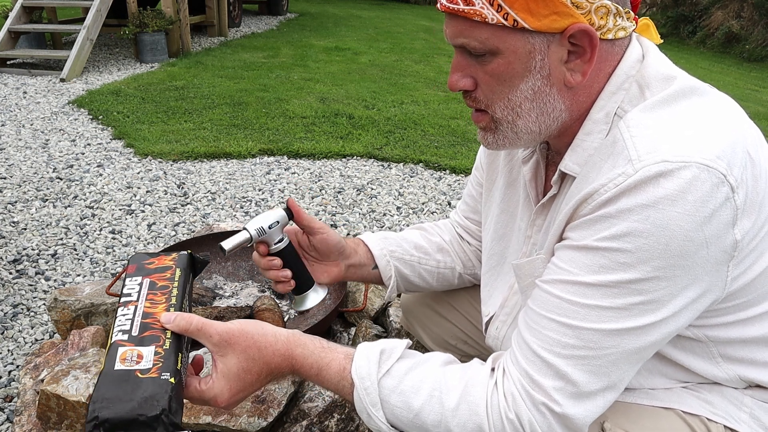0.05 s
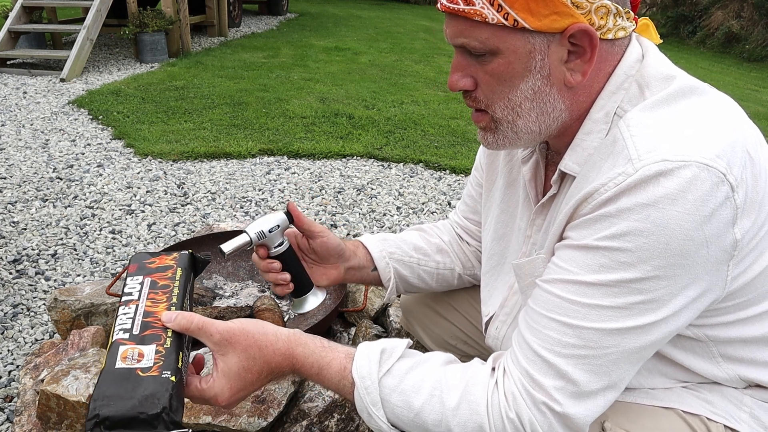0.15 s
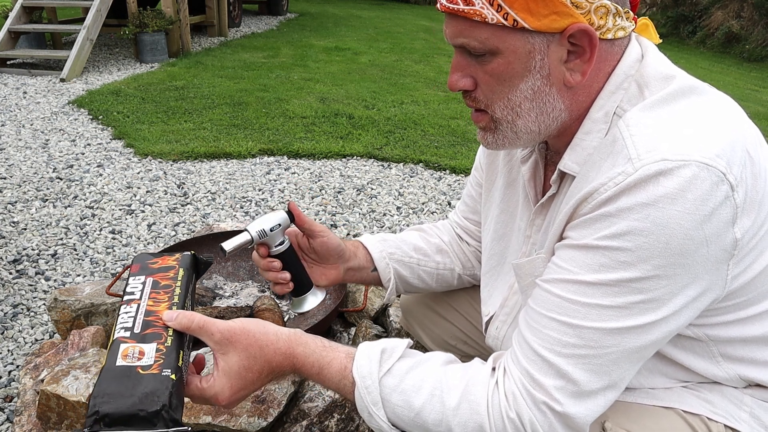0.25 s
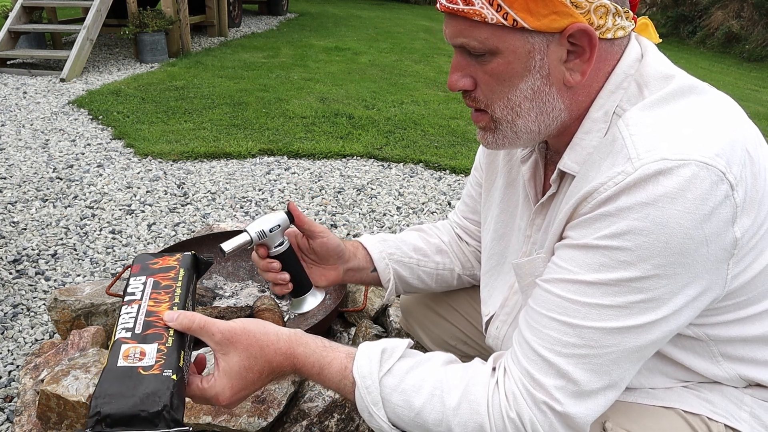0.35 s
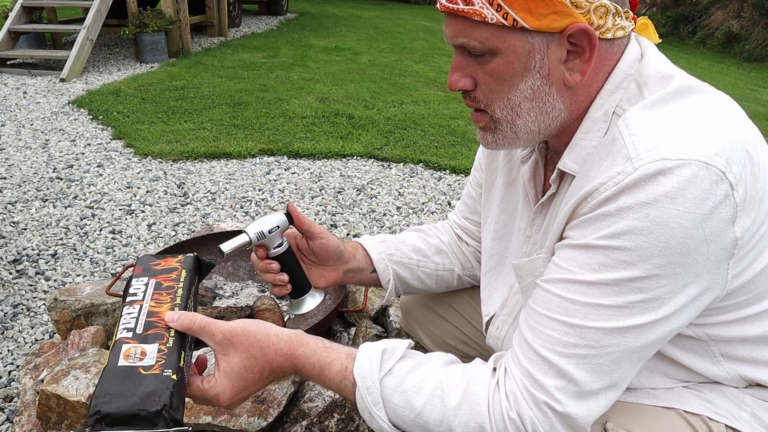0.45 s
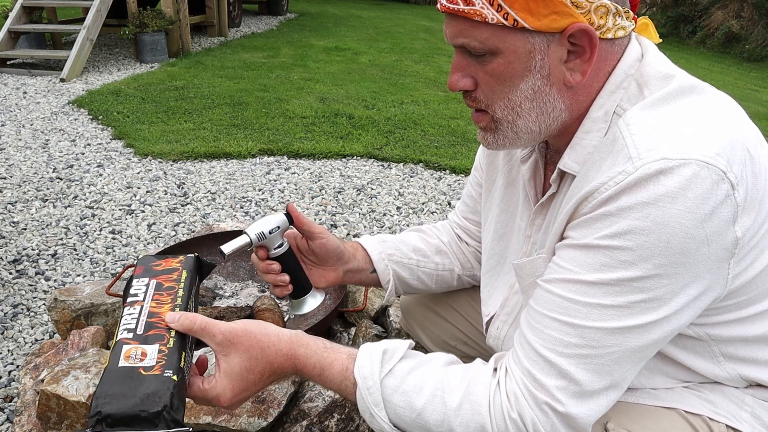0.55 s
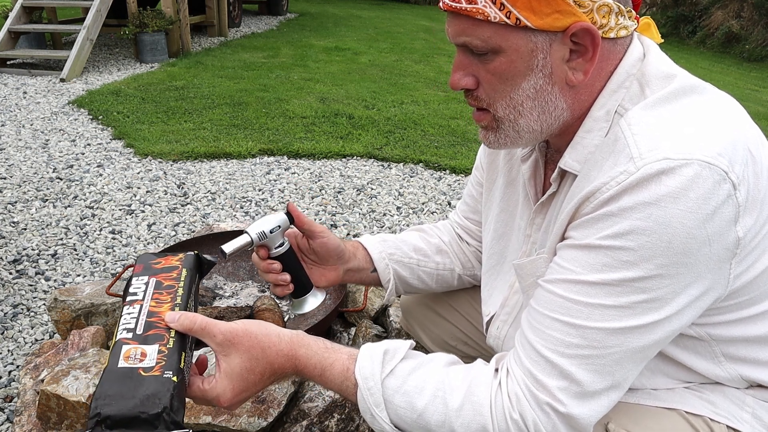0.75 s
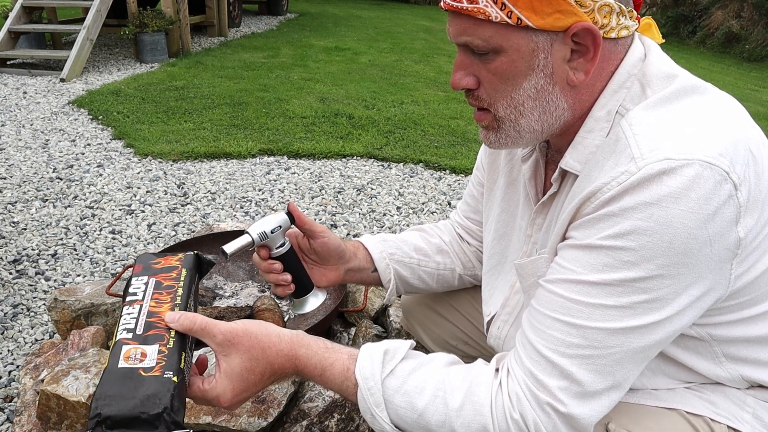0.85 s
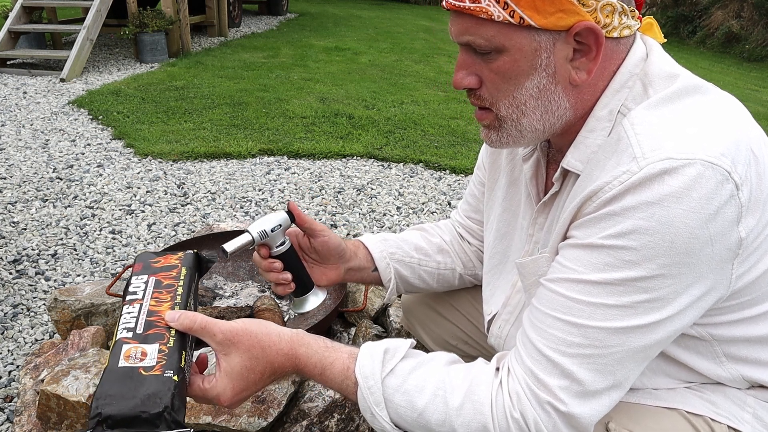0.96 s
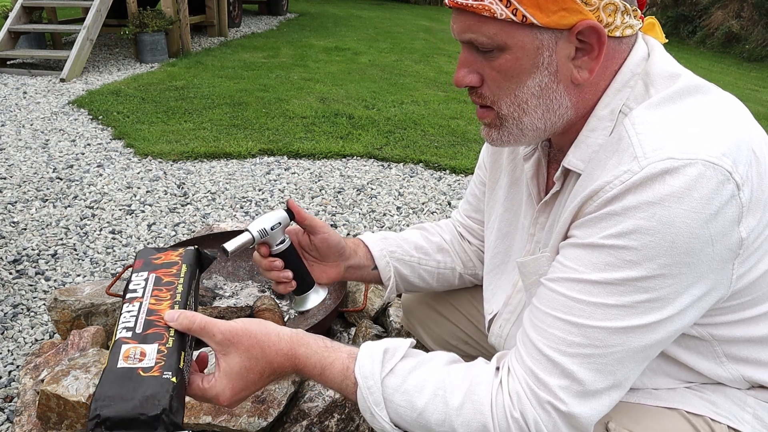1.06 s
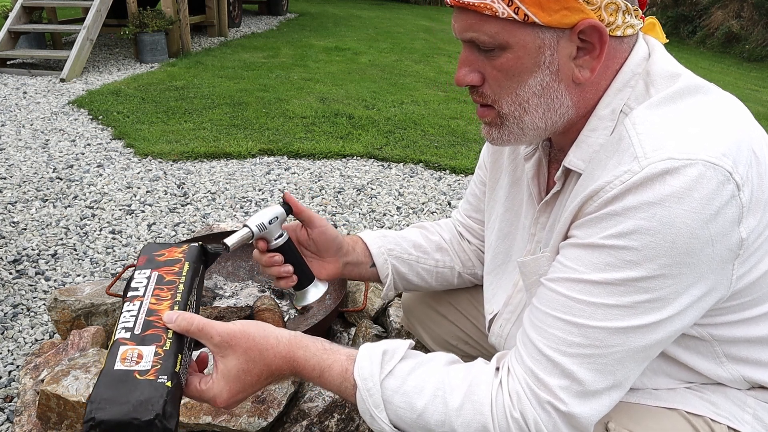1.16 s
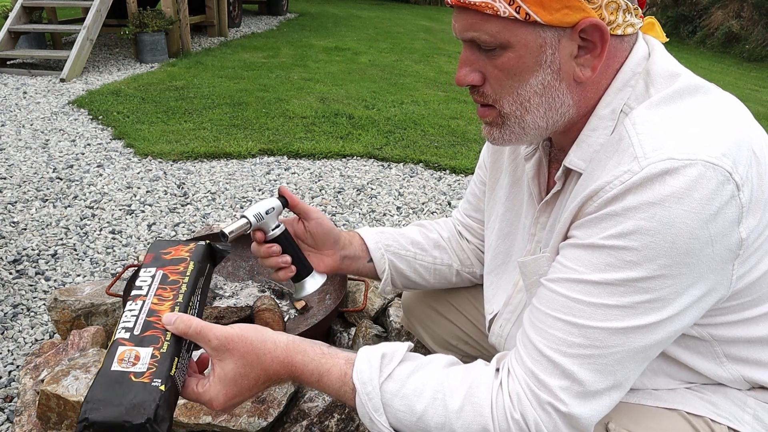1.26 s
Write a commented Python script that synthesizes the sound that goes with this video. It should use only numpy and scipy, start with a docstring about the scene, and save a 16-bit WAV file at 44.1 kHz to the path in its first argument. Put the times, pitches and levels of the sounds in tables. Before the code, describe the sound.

Gas torch close up: brief cold hiss, sharp igniter click, steady breathy flame, quick shut-off.

```python
"""A handheld gas torch, close to the microphone, outdoors in quiet garden air with a low breeze.
Cold gas hisses and whistles (shaped noise), then the igniter snaps (decaying modes and noise cracks).
The flame catches and roars softly (noise and resonances) over the hiss of its jet, amid a grainy rustle.
It pops once more (short swinging pulses), and the trigger is let go with a small tick."""
import sys
import numpy as np
from scipy import signal
from scipy.io import wavfile
from scipy.ndimage import uniform_filter1d

SR = 44100
rng = np.random.default_rng(int(sys.argv[2]) if len(sys.argv) > 2 else 0)


def invert_db(x):
    """Field ratio 10**(x/20) for x, a level in decibels (scalar or array-like)."""
    u = np.asarray(x, float) / 20
    return 10 ** u


def log_audio(samples):
    """Write samples as a 16-bit WAV file to the path given in sys.argv[1]."""
    # one column per channel
    frames = np.atleast_2d(samples).T
    # limit to full scale, then quantise
    limited = np.clip(frames, -1, 1)
    pcm = np.round(limited * 32767).astype(np.int16)
    wavfile.write(sys.argv[1], SR, pcm)


N = 57330
T = np.arange(N) / SR
NOISE_TOP_HZ = 15750  # noise layers have no treble above this, except the cracks of the blows
LIT_S, CATCH_S = 0.231, 0.0086  # the flame starts to catch, and takes this long


def evened(x):
    """Scales a signal to an rms of 1."""
    return x / np.sqrt(np.mean(x ** 2) + 1e-20)


def read(points, hz):
    """Reads a spectrum table at hz, on a logarithmic frequency axis."""
    f, value = np.transpose(points)
    return np.interp(np.log(hz + 1), np.log(f + 1), value)


def add(mix, s, sound):
    """Adds a sound to the mix in place, from s seconds on."""
    part = mix[round(s * SR):][:len(sound)]
    part += sound[:len(part)]


def noise(spectrum, patchy_db, flicker_db=0., size=512, top_hz=NOISE_TOP_HZ):
    """Random short-time spectra with drifting patches and a flicker shared by all bands; rms 1."""
    hop = size // 4
    frames, hz = N // hop + 5, np.fft.rfftfreq(size, 1 / SR)
    real, imaginary, patches = rng.standard_normal((frames, len(hz), 3)).T
    patches = uniform_filter1d(patches, size=9, axis=0)  # across frequency
    patches = evened(uniform_filter1d(patches, size=18, axis=1))  # across time
    flicker = evened(uniform_filter1d(rng.standard_normal(frames), size=4))
    level_db = read(spectrum, hz)[:, None] + patchy_db * patches + flicker_db * flicker
    z = (real + 1j * imaginary) * invert_db(level_db) * (hz < top_hz)[:, None]
    return evened(signal.istft(z, nperseg=size, noverlap=size * 3 // 4)[1][:N])


def resonate(x, hz, width):
    """Shifts hz to zero, smooths, shifts back: a resonance of gain 1."""
    turn = np.exp(2j * np.pi * hz * T)
    r = np.exp(-np.pi * width / SR)
    smooth = signal.lfilter([1 - r], [1, -r], x / turn)
    return 2 * (turn * smooth).real


def ramp(start, length):
    """Climbs in a straight line from 0 to 1."""
    return np.clip((T - start) / length, 0, 1)


# Spectrum of the quiet garden air: [f/Hz, relative level/dB per Hz]
AIR_SPECTRUM = [(20, -8), (70, -4.5), (130, -15.5), (500, -13.5), (1100, -17), (2500, -26.5), (16000, -34)]


def garden_air():
    """Faint, mostly low noise of the open air, slowly patchy."""
    return invert_db(-64) * noise(AIR_SPECTRUM, 1.6, size=2048)


def breeze():
    """A low breeze passes the microphone: rumbling noise under one bell-shaped swell."""
    centre_s, width_s, peak_db = 0.5, 0.24, -65.5  # width: from the centre down to 1/e
    rumble = noise([(20, -7), (90, 1), (200, -37)], 2.5, size=2048)
    return invert_db(peak_db) * rumble * np.exp(-((T - centre_s) / width_s) ** 2)


# Mid-high swells: [centre t/s, rise t/s, fall t/s, level/dB, treble level relative to it/dB]
RUSTLE_SWELLS = [(.3, 0.047, 0.17, -53, 0), (.49, 0.02, 0.019, -50, 2), (0.559, 0.021, 0.011, -52.5, 3.5),
                 (.655, 0.044, 0.052, -47, 3.5), (0.713, 0.049, 0.056, -49, -0.5),
                 (1.126, 0.037, 0.02, -47.5, -7), (1.15, 0.0053, 0.0086, -43.5, -12),
                 (1.19, 0.022, 0.03, -51, 0), (1.261, 0.0077, 0.013, -54.5, -4)]
# Spectrum of the grain: [f/Hz, relative level/dB per Hz]
RUSTLE_SPECTRUM = [(900, -30), (1400, -6.5), (2500, -3.5), (3250, -6.5), (3800, -1.5), (4400, -7.5),
                   (5100, -5.5), (6000, -11), (8300, -13), (10000, -42)]


def rustle():
    """Soft bell-shaped swells of grainy noise, each with more or less treble; their powers add."""
    grain = noise(RUSTLE_SPECTRUM, 1.5, 0.98, size=256)
    treble_hz = 4360
    low = signal.sosfiltfilt(signal.butter(4, treble_hz, fs=SR, output="sos"), grain)
    treble = grain - low
    low_power, treble_power = np.zeros(N), np.zeros(N)
    for s, rise, fall, db, treble_db in RUSTLE_SWELLS:
        bell = np.exp(-((T - s) / np.where(T < s, rise, fall)) ** 2)
        low_power += bell * invert_db(db) ** 2
        treble_power += bell * invert_db(db + treble_db) ** 2
    return np.sqrt(low_power) * low + np.sqrt(treble_power) * treble


# Spectrum of the crack in each blow: [f/Hz, relative level/dB per Hz]
CRACK_SPECTRUM = [(800, -30), (1910, -3), (3900, -6), (5100, -22), (8200, 2.5), (10600, -26), (12600, -1),
                  (15300, -9), (16700, -50)]


def strike(modes, blows):
    """Each blow rings the decaying modes of the struck part and throws a short noise crack."""
    crack_db, crack_t60_s, attack_s = -5, 0.019, 0.00023
    out, t = np.zeros(N), T[:3000]
    crack = noise(CRACK_SPECTRUM, 0., size=256, top_hz=SR / 2)
    for s, db, tilt_db in blows:
        ring = np.zeros(len(t))
        for hz, mode_db, t60 in modes:
            tilted_db = mode_db + tilt_db * np.log2(hz / 4000)
            ring += invert_db(tilted_db - 60 * t / t60) * np.sin(2 * np.pi * hz * t)
        start = int(rng.random() * (N - len(t)))  # a random stretch of crack for each blow
        burst = crack[start:][:len(t)] * invert_db(crack_db - 60 * t / crack_t60_s)
        add(out, s, invert_db(db) * np.minimum(t / attack_s, 1) * (0.56 * ring + burst))
    band = signal.butter(5, [900, 16600], "bandpass", fs=SR, output="sos")  # Hz
    return signal.sosfilt(band, out)


# Ringing of the trigger lever: [f/Hz, relative level/dB, t60/s]
LEVER_MODES = [(1430, 11, .007), (3060, 6, .006), (5100, 7, .0025), (7400, 5, .005), (8600, 4, .005),
               (12950, 0, .005)]
# The lever springs back: [t/s, level/dB, tilt of the ringing/dB per octave about 4 kHz]
RELEASE_BLOWS = [(1.2341, -38, -1), (1.2348, -39, 2)]


def trigger_release():
    """The trigger lever springs back and ticks: two faint blows ring it."""
    return strike(LEVER_MODES, RELEASE_BLOWS)


# Ringing of the torch body: [f/Hz, relative level/dB, t60/s]
BODY_MODES = [(1480, -9, 0.014), (1760, -4, 0.014), (1990, -4.5, 0.014), (2990, -12, 0.013),
              (3700, -4, 0.008), (4400, -7, 0.01), (6200, -3, 0.018), (7550, 0, 0.016), (7980, -3, 0.015),
              (8380, 1.5, 0.016), (8800, -4, 0.014), (12150, 0.5, 0.007), (13380, -0.5, 0.012),
              (13850, -5, 0.01), (15200, -5, 0.007)]
# Blows of the igniter: [t/s, level/dB, tilt of the ringing/dB per octave about 4 kHz]
IGNITER_BLOWS = [(.2304, -10.5, 1.4), (0.23095, -17, -5), (.2325, -21, 0), (0.2352, -24.5, 1)]


def igniter():
    """The igniter snaps: blows in quick succession ring the torch body."""
    return strike(BODY_MODES, IGNITER_BLOWS)


# Cold gas through the nozzle: [f/Hz, relative level/dB per Hz]
COLD_SPECTRUM = [(1500, -24.5), (3700, -22), (4300, -4), (5400, -2.5), (5950, -11), (6700, 0), (7500, -5),
                 (8600, -2.5), (10700, -13), (12200, -7), (13300, -4), (14500, -16)]
# Whistle of the nozzle: [f/Hz, width/Hz, level relative to the hiss/dB]
NOZZLE_WHISTLE = [(13040, 100, -6.5)]


def cold_gas():
    """The valve opens; unlit gas hisses and faintly whistles until the flame catches."""
    open_s, rise_s, level_db = 0.081, 0.013, -52.5
    hiss = noise(COLD_SPECTRUM, 1.5, 1.)
    whistle = sum(invert_db(db) * evened(resonate(hiss, hz, width)) for hz, width, db in NOZZLE_WHISTLE)
    unlit = ramp(open_s, rise_s) * (1 - ramp(LIT_S, CATCH_S))
    return invert_db(level_db) * (hiss + whistle) * unlit


# Flame pops: [t/s, level/dB, f/Hz, cycles until the swing has decayed to about a third]
FLAME_POPS = [(.2327, -35, 440, 1.2), (.2349, -30, 290, 1.4), (.2345, -37, 150, .9),
              (1.1408, -38, 670, 2.2), (1.1431, -32, 270, 1.1)]


def pops():
    """A pocket of gas burns at once: a pulse that swings a few times."""
    out, t = np.zeros(N), T[:3000]
    for s, db, hz, cycles in FLAME_POPS:
        u = t * hz / cycles * 3.26
        swell = np.e * u * np.exp(-u)  # peaks at 1 where u = 1
        add(out, s, invert_db(db) * swell * np.sin(2 * np.pi * hz * t))
    return out


# Gas flow: [t/s, jet level/dB, roar level/dB]
GAS_FLOW = [(.235, -55, -47), (.255, -52.5, -45.5), (.32, -51.5, -47), (.43, -54.5, -47),
            (.53, -53.5, -48.5), (.65, -51, -45.5), (.8, -54.5, -48.5), (.9, -51.5, -45),
            (1.05, -50.5, -46), (1.125, -54, -48), (1.15, -51, -45), (1.217, -51, -45),
            (1.226, -52.5, -50.5), (1.25, -60, -50), (1.275, -69, -54.5), (1.3, -71.5, -61.5)]
# Jet once the flame burns: [f/Hz, relative level/dB per Hz]
JET_SPECTRUM = [(3000, -48), (4200, -12.5), (5200, -4), (5900, -14), (7200, -10), (8300, 1.5), (8900, -6.5),
                (9700, -18), (12500, -4.5), (14000, -7.5), (16000, -24)]
# Broad roar of the flame: [f/Hz, relative level/dB per Hz]
ROAR_SPECTRUM = [(30, -36), (100, -12.5), (200, -1.5), (350, -1.5), (700, -5.5), (1500, -8), (3200, -12),
                 (6000, -28.5), (9000, -47)]
# Hollows the roar rings in: [f/Hz, width before a 1.4-fold widening/Hz, relative level/dB]
ROAR_HOLLOWS = [(335, 85, -3), (521.7, 53, -5), (671.5, 65, 0.5), (1015, 69, -4), (1267, 133, -4),
                (1794, 94, -6), (2429, 80, -12)]


def flame():
    """Jet hiss and turbulent roar with hollow resonances, both following the gas flow."""
    s, jet_db, roar_db = np.transpose(GAS_FLOW)
    broad = noise(ROAR_SPECTRUM, 2.63, 0.67, size=1024)
    white = noise([(20, 0), (20000, 0)], 1.34, 0.86)
    rings = np.zeros(N)
    for hz, width, db in ROAR_HOLLOWS:
        once = resonate(white, hz, 1.4 * width)
        twice = resonate(once, hz, 1.4 * width)  # steeper skirts
        rings += invert_db(db) * evened(twice)
    hollow_db = 1.6  # rings relative to the broad roar
    roar = evened(broad + invert_db(hollow_db) * evened(rings)) * invert_db(np.interp(T, s, roar_db))
    jet = noise(JET_SPECTRUM, 1.67, 0.8) * invert_db(np.interp(T, s, jet_db))
    return (roar + jet) * ramp(LIT_S, CATCH_S)


def scene():
    """Sums the garden, the rustle and the torch into one channel."""
    background = garden_air() + breeze() + rustle()
    torch = trigger_release() + igniter() + cold_gas() + pops() + flame()
    return (background + torch)[None]


def top_cut(x):
    """Nothing passes above the cut-off."""
    return signal.sosfilt(signal.butter(12, 17080, fs=SR, output="sos"), x)


def record(dry):
    """Takes the finished mix as it stands at the microphone."""
    return top_cut(dry)


dry = scene()
out = record(dry)
log_audio(out)
```